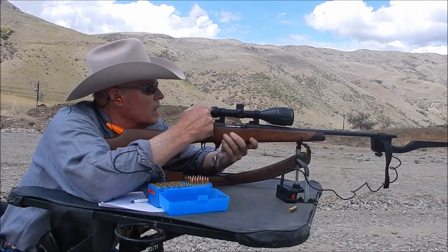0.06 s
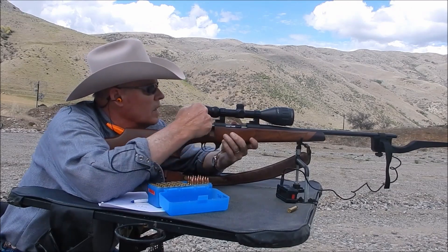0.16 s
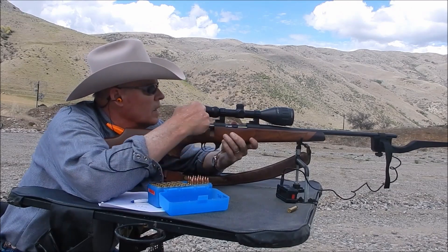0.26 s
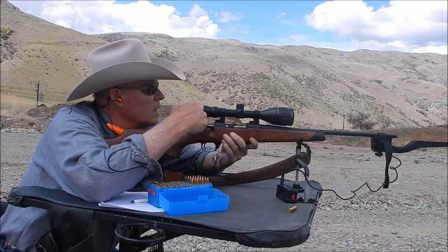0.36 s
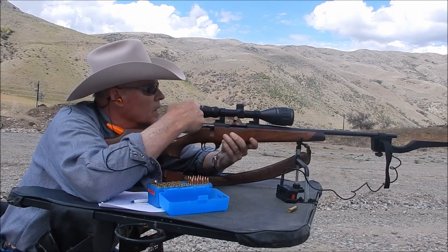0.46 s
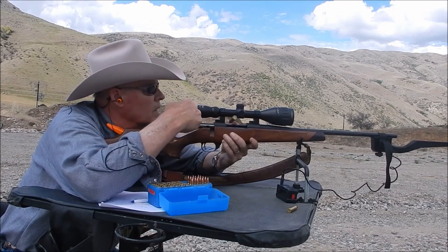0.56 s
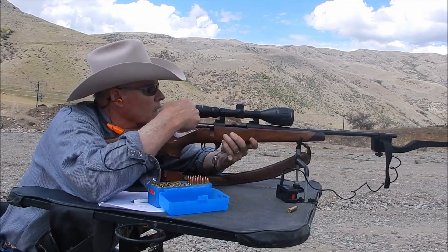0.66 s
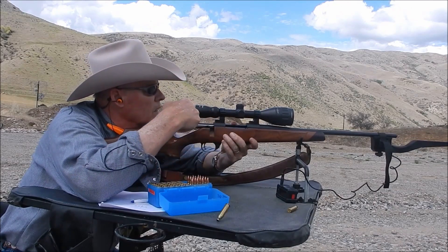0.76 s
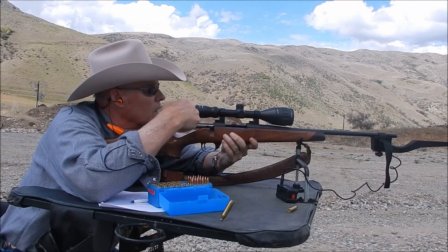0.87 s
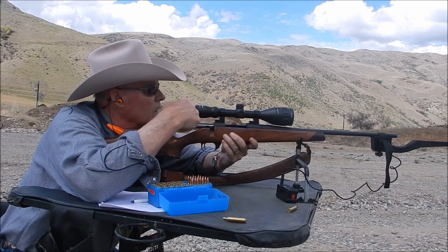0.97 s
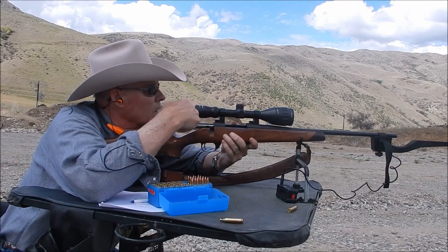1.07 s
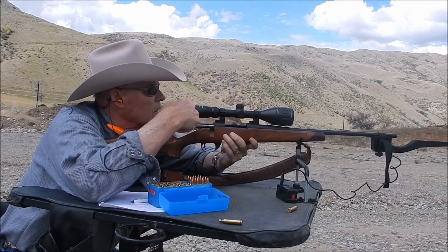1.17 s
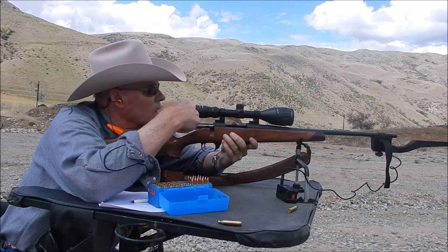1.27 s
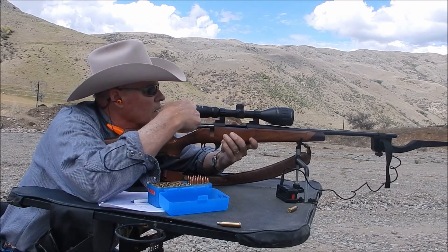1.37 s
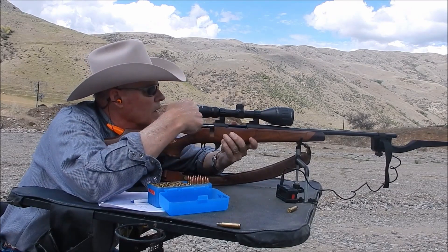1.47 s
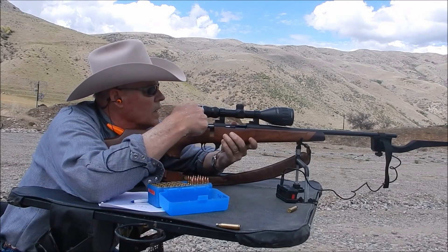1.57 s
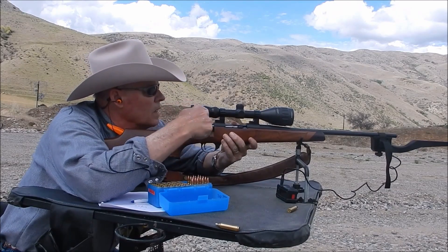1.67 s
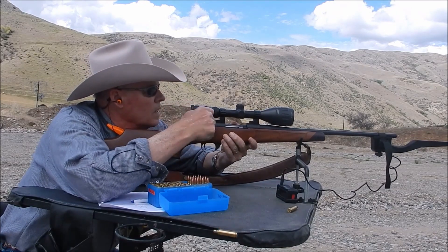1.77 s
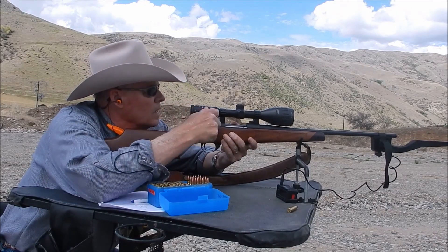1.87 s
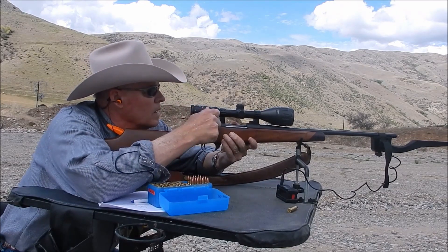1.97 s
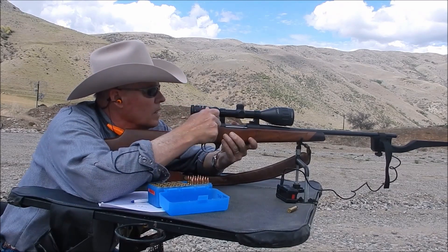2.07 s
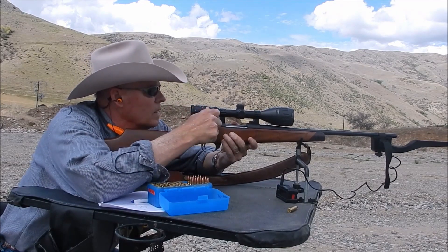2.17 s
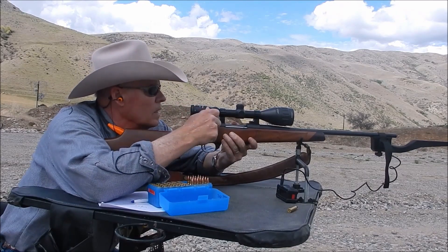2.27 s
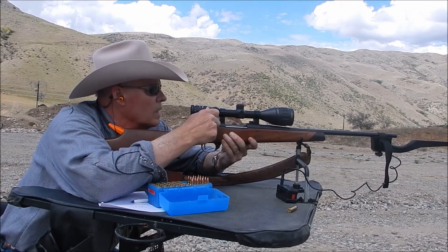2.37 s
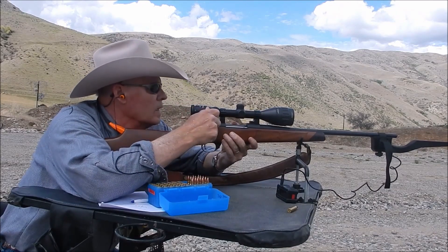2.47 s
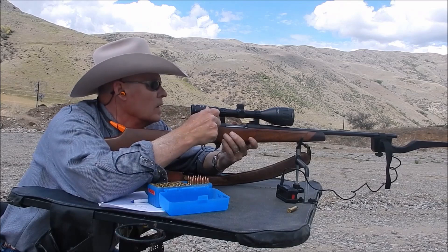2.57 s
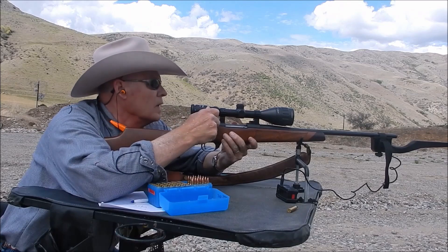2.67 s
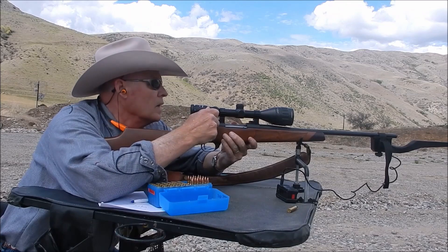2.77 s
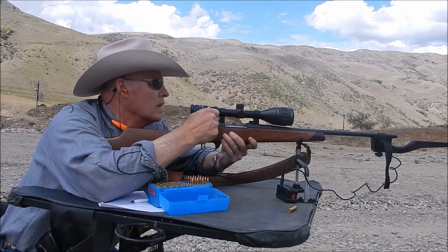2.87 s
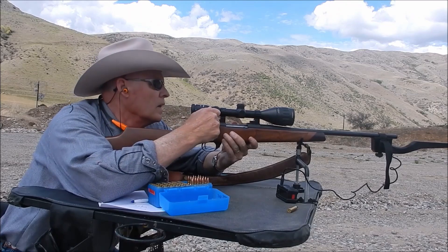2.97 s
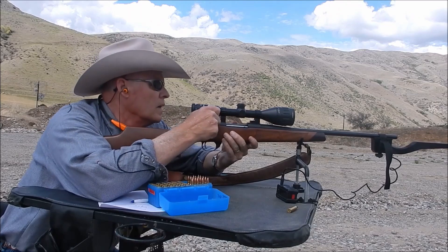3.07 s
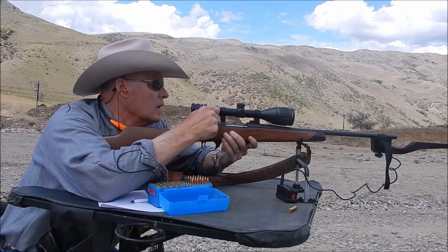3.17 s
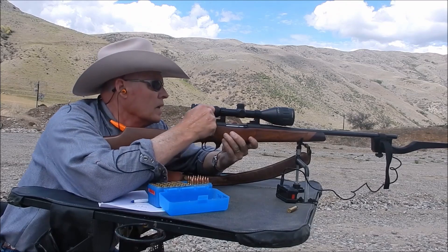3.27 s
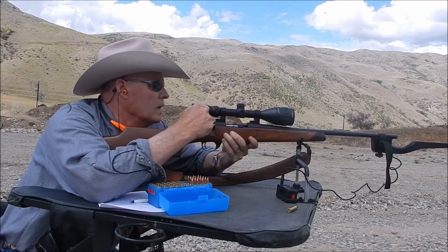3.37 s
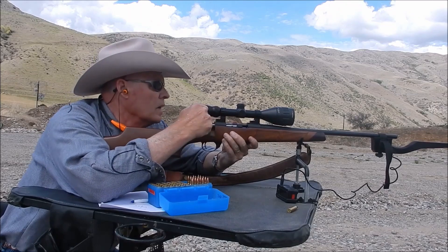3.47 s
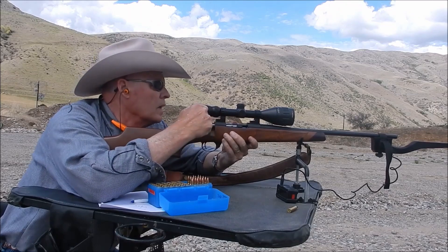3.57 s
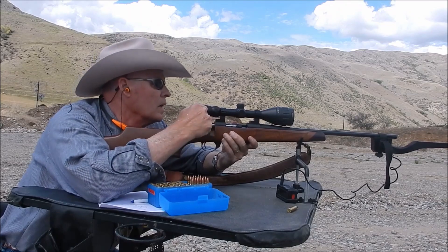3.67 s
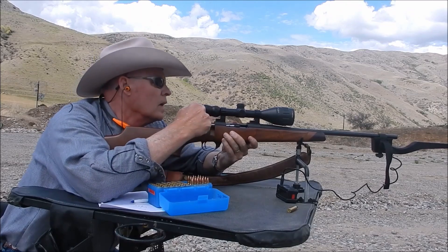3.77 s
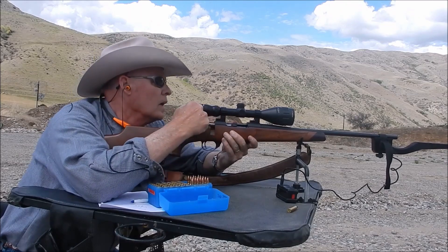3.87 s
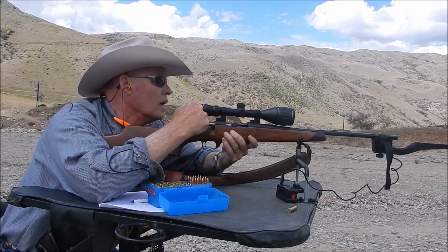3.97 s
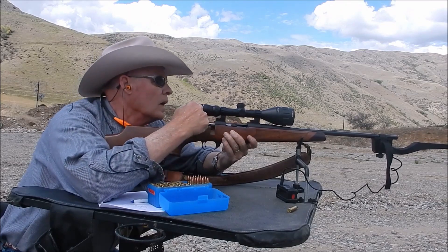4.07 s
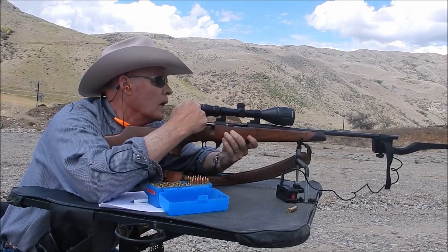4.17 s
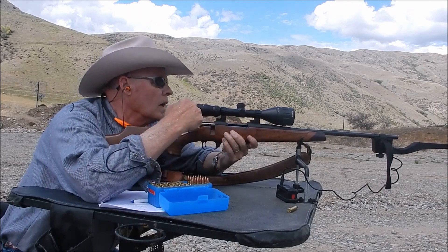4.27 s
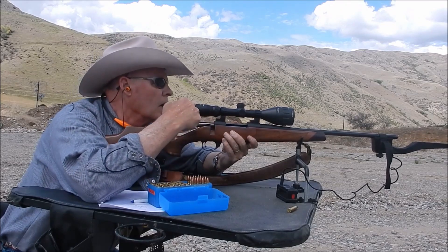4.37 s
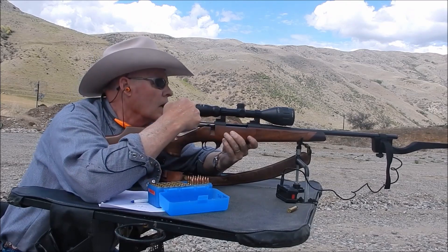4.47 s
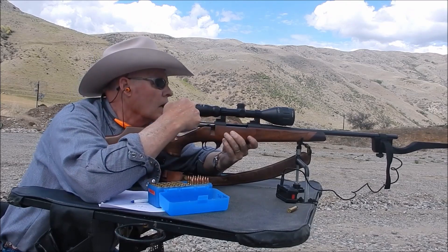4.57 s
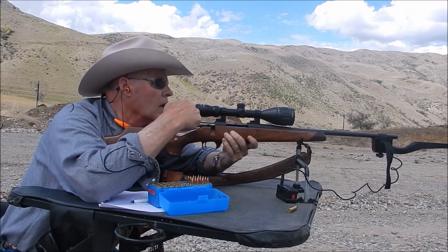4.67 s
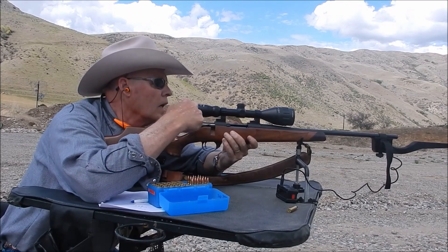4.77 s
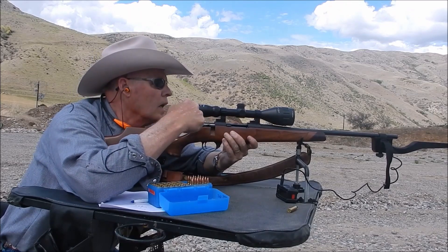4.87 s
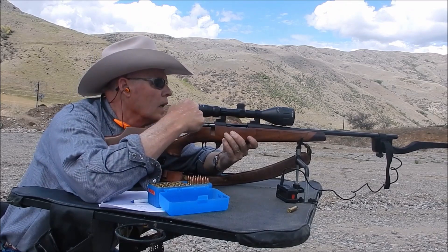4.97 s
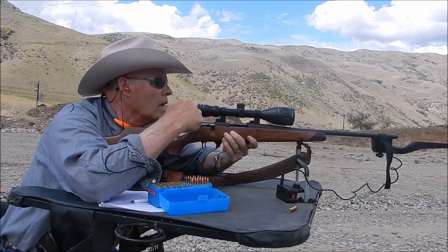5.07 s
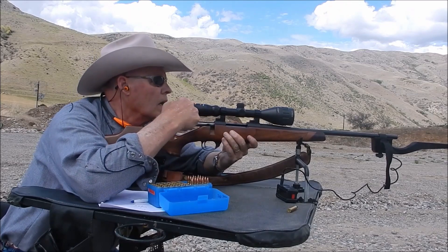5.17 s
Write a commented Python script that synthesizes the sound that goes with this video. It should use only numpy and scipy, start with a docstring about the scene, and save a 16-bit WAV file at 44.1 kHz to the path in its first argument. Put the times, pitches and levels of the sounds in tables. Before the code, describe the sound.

A rifle bolt is worked close by with sharp metallic clacks, a spent case clinks onto a table, and a faint bird whistles outdoors.

```python
'''A rifle bolt worked close to the microphone at an outdoor bench: lifted, drawn, a round fed, closed.
Each blow is a scuff and a burst of rebounds ringing the steel; small slips make the slides.
A thin part and the cartridge ring high; the spent case rings, lands and drums on the table.
Far off a songbird whistles in gliding tones. Shaped noise makes the low rumble, wind on the
microphone and soft hiss; these three dip after two of the blows and come back.'''
import sys
import numpy as np
from scipy import signal
from scipy.fft import rfft, irfft
from scipy.io import wavfile

SR = 44100
rng = np.random.default_rng(int(sys.argv[2]) if len(sys.argv) > 2 else 0)


def materialize(psi):
    """Save the field psi as 16-bit PCM at rate SR to the path in sys.argv[1].

    A 1-D psi becomes a single channel; in a 2-D psi each row is a channel.
    """
    bounded = np.clip(np.atleast_2d(psi).T, -1, 1)
    quanta = np.round(bounded * 32767).astype(np.int16)
    wavfile.write(sys.argv[1], SR, quanta)


N = 229981
TIME = np.arange(N) / SR  # s

# Air around the bench, relative noise spectra: pitch_hz, density_db (per Hz)
RUMBLE_SPECTRUM = [(40, -19.5), (100, -13.5), (125, -1.5), (155, 2.5), (205, -3), (250, -15.5), (300, -4),
                   (345, -5.5), (420, -18.5), (495, -12.5), (600, -26.5), (1200, -36.5), (2500, -75)]
WIND_SPECTRUM = [(25, 3), (85, 11.5), (130, -8.5), (300, -64.5)]
HISS_SPECTRUM = [(400, 4), (1100, 7.5), (2200, -2.5), (3200, -8), (4300, -9), (6000, -19), (8000, -24),
                 (15000, -36.5)]
# Swells of the rumble, and gusts on the microphone: centre_s, half_width_s (to 1/e of the rise), rise_db
RUMBLE_SWELLS = [(1.8, 0.88, 8.4), (2.71, 0.042, 7.4), (3.13, 0.24, 5), (3.8, 0.14, 3.96), (4.42, 1, 8.8)]
GUSTS = [(.2, 0.25, 16), (.93, 0.027, 27)]
RUMBLE_DB, WIND_DB = -45.5, -58.5  # before swells, gusts and dips
LUMPY_DB = 2.1  # rms of random lumps in the rumble
# Dips of rumble, wind and hiss after two of the blows: start_s, depth_db
DIPS = [(.68, 7.5), (2.266, 25.5)]
DIP_FALL_S, DIP_HOLD_S, RECOVERY_DB_PER_S = 0.0081, 0.17, 22

# Strokes of the bolt in its raceway, and a handling rustle at 4.27 s: start_s, length_s, level_db
STROKES = [(0.042, 0.02, -61.5), (0.274, 0.012, -44.5), (0.427, 0.23, -65.5), (1.558, 0.41, -60),
           (1.575, 0.28, -52), (1.654, 0.045, -39), (2.577, 0.036, -70.5), (2.659, 0.063, -80),
           (3.304, 0.16, -68), (4.272, 0.17, -63.5)]
STROKE_RISE_S, STROKE_RELEASE_S = 0.0078, 0.016
SLIPS_PER_S, CLUMP_DB = 3200, 4  # mean catches of the sliding steel, rms unevenness

# What bolt, receiver and barrel ring with: pitch_hz, level_db (relative)
ACTION_MODES = [(1070, -1.5), (1160, -3), (1300, -1), (1450, -0.5), (1700, -0.5), (1950, -3), (2170, 2),
                (2360, 2.5), (2950, 1.5), (3250, -3.5), (3850, 5.5), (4080, 8.5), (4300, 0), (4880, 4),
                (5950, -0.5), (7270, 1), (8750, 0), (10800, -4.5)]
# Metal on metal: start_s, level_db (low and middle bands together, before the gain in rifle),
# treble_db (against that level), strongest_hz, chatter_s (stretched in click)
BLOWS = [(0.2661, -32, -8.5, 4200, 0.0019), (0.2697, -32.5, -9, 3950, 0.002),
         (0.284, -33, -7, 4270, 0.0025), (.503, -37.5, -24, 4360, 0.0029), (0.5404, -32, -24, 2360, 0.0014),
         (0.6364, -26.5, -18.5, 1090, 0.0023), (0.675, -28.5, -28.5, 1300, 0.0012),
         (0.6771, -20.5, -19, 1600, 0.0007), (.688, -28.5, -21, 1310, 0.00041),
         (0.8239, -40, -19.5, 937, 0.0027), (0.8278, -48, -11, 4830, 0.00022),
         (1.0533, -51.5, -17, 2400, 0.00088), (1.5029, -37, -13, 4170, 0.0022),
         (1.6577, -35.5, -23, 2220, 0.004), (1.6794, -25.5, -13.5, 2070, 0.00035),
         (1.7165, -26.5, -16.5, 1070, 0.0027), (1.74, -42.5, -14.5, 2930, 0.0013),
         (1.7706, -29, -22.5, 1020, 0.001), (1.7792, -41.5, -24.5, 3900, .001),
         (1.8, -30.5, -34, 1020, 0.002), (1.8281, -31, -33, 3780, 0.0025),
         (1.9987, -27.5, -27, 3970, 0.0024), (2.263, -34.5, -8, 4820, 0.00013),
         (3.378, -45, -22, 3930, 0.00062), (3.403, -48, -30.5, 3000, .0009),
         (3.414, -47, -22.5, 3000, .001), (3.9282, -36, -31.5, 1170, 0.0018),
         (4.265, -41, -29, 1950, 0.0018), (4.4249, -33, -13, 1040, 0.0019)]
# Low, middle and high band of a blow: from_hz, to_hz
BLOW_BANDS = [(800, 2500), (2500, 5900), (6500, 13500)]
# Dull taps of the hand on the rifle: start_s, level_db (before the tilt in rifle)
HAND_TAPS = [(0.074, -54.5), (0.3284, -52), (0.457, -54), (0.514, -56), (0.75, -55), (1.1465, -56),
             (1.607, -42), (1.624, -44), (1.901, -51), (1.975, -53.5), (3.175, -55), (3.2948, -54),
             (3.761, -55), (4.36, -53), (4.3847, -49.5), (4.836, -52), (5.155, -55)]
RUN_UP = 176  # samples of scuff before a blow
CRACK_S = 0.0009  # time for the crack to fall to 1/e
# A blow that rings higher has less body: low and middle are equal at EVEN_HZ
EVEN_HZ, THINNING_DB_PER_OCTAVE = 1380, 4.5

# A thin part of the action rings in close, beating modes: pitch_hz, level_db (relative), t60_s
THIN_LOW_MODES = [(9722, 0, 0.2), (9679, -7, 0.21), (9790, -11, 0.12)]
THIN_HIGH_MODES = [(14145, -1, .14), (14210, -9, 0.11), (14600, -11, .13)]
THIN_SHIFT = 0.0015  # rms pitch shift from clink to clink, as a share
# Its clinks: start_s, lower_ring_db, upper_ring_db, tick_db (before the tilt in rifle)
CLINKS = [(0.228, -68, -90, -58), (0.505, -63.5, -43, -65), (0.545, -47, -43, -70), (0.828, -72, -77, -65),
          (2.264, -41, -37, -64.5), (2.404, -65, -69, -68.5), (2.46, -60.5, -71.5, -68),
          (2.501, -84, -78, -72.5), (2.528, -79, -77, -69.5), (2.543, -55.5, -73, -65),
          (2.6104, -65.5, -59, -61), (2.677, -69, -65, -69), (2.702, -64.5, -61, -66)]
# Fingers close on the thin part and stop its ring
GRIP_S, GRIP_DB_PER_S = 2.725, 800

# The spent case rings as it is flung out: pitch_hz, level_db, t60_s
EJECTED_MODES = [(1950, -45, 0.22), (4130, -48, .14), (7300, -59, 0.13)]
EJECT_S = 0.679
# Table top under the case: pitch_hz, level_db (relative)
TABLE_MODES = [(175, 4.5), (255, -3.5), (345, -3.5), (420, -1), (506, -3), (610, -12)]
# The case landing on the table: start_s, level_db
BOUNCES = [(.831, -34), (.845, -39), (1.054, -41.5)]

# Whistles of the far bird: start_s, length_s, start_hz, end_hz, level_db
BIRD_NOTES = [(0.784, 0.13, 3020, 2620, -75), (2.9, 0.15, 3460, 3166, -86.5),
              (3.306, 0.11, 4760, 4720, -81), (3.617, 0.12, 3013, 2956, -64.5),
              (3.817, 0.033, 3900, 2130, -60), (3.986, 0.032, 3900, 2220, -57),
              (4.099, 0.047, 2970, 2800, -57.5), (4.135, 0.078, 2010, 1967, -53),
              (4.269, 0.027, 2220, 2100, -53)]
BURR = 0.02  # rms pitch scatter of the burred note, as a share

# Cartridge, lower and upper modes: pitch_hz, level_db (relative)
CARTRIDGE_LOW_MODES = [(5982, 0), (6043, -6), (8800, -22)]
CARTRIDGE_HIGH_MODES = [(12550, 0), (12850, -4), (15050, -6)]
# Its contacts as it is fed: start_s, lower_ring_db, upper_ring_db, t60_s (of the lower modes)
FEED_CONTACTS = [(1.6573, -27.5, -56, 0.021), (1.6795, -36, -51.5, 0.063), (1.74, -34, -53.5, 0.16),
                 (1.7788, -36.5, -54, 0.07), (1.829, -38, -52, 0.026)]
HIGH_RING_SHARE = 0.45  # upper modes' t60 as a share of the lower modes'

PORT_LAG_SAMPLES = 0.33  # the right microphone port hears this much later
EDGE_HZ = 16200  # upper band limit


def amp(db):
    """Decibels to gain."""
    return 10 ** (np.asarray(db) / 20)


def evened(x):
    """Scaled to rms 1."""
    return x / np.sqrt(np.mean(x ** 2) + 1e-20)


def add(mix, s, sound):
    """Mixes a sound in at s seconds."""
    part = mix[max(round(s * SR), 0):][:len(sound)]
    part += sound[:len(part)]


def band(x, edges, order=3):
    """Causal band-pass."""
    edges = np.clip(edges, 10, SR / 2 - 100)
    return signal.sosfilt(signal.butter(order, edges, "band", fs=SR, output="sos"), x)


def noise(spectrum):
    """Noise of rms 1 with the given spectrum."""
    hz, db = np.transpose(spectrum)
    log_hz = np.log(np.fft.rfftfreq(N, 1 / SR) + 1)
    shape = amp(np.interp(log_hz, np.log(hz), db))
    return evened(irfft(rfft(rng.standard_normal(N)) * shape, N))


def wander(rate_hz):
    """Random wavering of rms 1, whose spectrum falls to 1/e at rate_hz."""
    shape = np.exp(-(np.fft.rfftfreq(N, 1 / SR) / rate_hz) ** 2)
    return evened(irfft(rfft(rng.standard_normal(N)) * shape, N))


def damped(modes, t60_at_1k, fall):
    """Gives each mode its decay time: higher modes die sooner."""
    return [(hz, db, t60_at_1k * (hz / 1000) ** -fall) for hz, db in modes]


def ring(modes, spread_db=0, shift=0):
    """Dying modes of a struck body; mode levels and the common pitch may scatter from blow to blow."""
    t = np.arange(16000) / SR
    pitch = 1 + shift * rng.standard_normal()
    out = np.zeros(len(t))
    for hz, db, t60 in modes:
        sign = rng.choice([-1, 1])
        level_db = db + spread_db * rng.standard_normal() - 60 * t / t60
        out += sign * amp(level_db) * np.sin(2 * np.pi * hz * pitch * t)
    return out


def swelling(rows):
    """Decibels added by bell-shaped swells."""
    return sum(db * np.exp(-((TIME - s) / width) ** 2) for s, width, db in rows)


def dipping(recovery_db_per_s):
    """Decibels lost in the dips: a quick fall, a hold, a steady recovery."""
    lost_db = np.zeros(N)
    for s, depth_db in DIPS:
        fall = np.clip((TIME - s) / DIP_FALL_S, 0, 1)
        recovered_db = recovery_db_per_s * (TIME - s - DIP_HOLD_S)
        lost_db += fall * np.clip(depth_db - recovered_db, 0, depth_db)
    return lost_db


def pair(spectrum, side_db, left_db):
    """Stereo noise: a shared part and a weaker part in which the two sides differ."""
    mid, side = noise(spectrum), amp(side_db) * noise(spectrum)
    return np.array([amp(left_db / 2) * (mid + side), amp(-left_db / 2) * (mid - side)])


def air(hiss_db=-61.0, hiss_follow=0.29, hiss_recovery_db_per_s=18):
    """A hollow, lumpy rumble, wind buffeting each microphone port, and a soft hiss that rises with the rumble."""
    swell_db, dip_db = swelling(RUMBLE_SWELLS), dipping(RECOVERY_DB_PER_S)
    rumble_db = RUMBLE_DB + swell_db - dip_db + LUMPY_DB * wander(6.7)
    rumble = amp(rumble_db) * pair(RUMBLE_SPECTRUM, side_db=-19, left_db=-1.5)
    wind_db = WIND_DB + swelling(GUSTS) - dip_db
    wind = amp(wind_db) * pair(WIND_SPECTRUM, side_db=-3.5, left_db=-9.5)
    hiss_level_db = hiss_db + hiss_follow * swell_db - dipping(hiss_recovery_db_per_s)
    hiss = amp(hiss_level_db) * pair(HISS_SPECTRUM, side_db=-7.5, left_db=-0.5)
    return rumble + wind + hiss


def strokes():
    """Pressure of the sliding bolt or handling hand: each stroke rises, holds and dies away."""
    pressure = np.zeros(N)
    for s, length, db in STROKES:
        rise = np.clip((TIME - s) / STROKE_RISE_S, 0, 1)
        release = np.exp(-np.maximum(TIME - s - length, 0) / STROKE_RELEASE_S)
        pressure += amp(db) * rise * release
    return pressure


def slide(grit_db=-1, top_hz=4600):
    """Sliding steel catches in clumps of small slips that ring the action, over a dull grit."""
    caught = rng.random(N) < SLIPS_PER_S / SR
    slips = rng.standard_normal(N) * caught * amp(CLUMP_DB * wander(76))
    steel = ring(damped(ACTION_MODES, 0.064, 0.88))
    rung = evened(band(signal.oaconvolve(slips, steel)[:N], [500, top_hz], order=2))
    grit = evened(band(slips, [750, 3600], order=2))
    return evened(rung + amp(grit_db) * grit) * strokes()


def band_levels(db, treble_db, ring_hz):
    """Shares a blow's level among low, middle and high: the higher it rings, the thinner it is."""
    body_db = -THINNING_DB_PER_OCTAVE * np.log2(ring_hz / EVEN_HZ)
    middle_db = db - 10 * np.log10(1 + amp(body_db) ** 2)
    return middle_db + body_db, middle_db, db + treble_db


def blow_force(chatter, rattle, run_up_db):
    """Force at the contact: a rising scuff, one blow, then a burst of tiny rebounds."""
    t = np.arange(8000) / SR
    struck = rng.random(len(t)) < 5000 / SR  # 5000 rebounds per second on average
    rebounds = rng.standard_normal(len(t)) * struck * np.exp(-(t / (1.96 * chatter)) ** 2)
    force = rattle * rebounds / (np.linalg.norm(rebounds) + 1e-9)
    force[0] += 1
    scuff = rng.standard_normal(RUN_UP) * np.linspace(0, 1, RUN_UP) ** 2
    return np.r_[amp(run_up_db) * scuff / np.linalg.norm(scuff), force]


def click(levels_db, ring_hz, chatter, favour_db=8.0, crack_db=0.0, rattle=0.92, run_up_db=-13, softness=0.71):
    """A scuff, a blow and its rebounds ring the action; the contact point favours some modes."""
    force = blow_force(chatter, rattle, run_up_db)
    modes = []
    for hz, db in ACTION_MODES:
        favoured_db = db + favour_db * np.exp(-(np.log(hz / ring_hz) / 0.065) ** 2)
        # the parts sit differently at each blow, which shifts the modes a little
        modes.append((hz * (1 + 0.019 * rng.standard_normal()), favoured_db))
    t = np.arange(8000) / SR
    body = ring(damped(modes, 0.024, 0.73), spread_db=0.5)[:len(t)]
    crack = rng.standard_normal(len(t)) * np.exp(-t / CRACK_S)  # countless heavily damped modes
    blow = body / np.linalg.norm(body) + amp(crack_db) * crack / np.linalg.norm(crack)
    # the contact is slightly soft
    sound = signal.lfilter([1], [1, -softness], signal.fftconvolve(force, blow))
    parts = [band(sound, edges) for edges in BLOW_BANDS]
    levelled = sum(amp(db) * part / np.linalg.norm(part) for db, part in zip(levels_db, parts))
    return levelled * np.sqrt(SR / 100)  # band levels are rms over 10 ms


def gripped(s):
    """Gain of a ring that is held and stopped at s seconds."""
    return amp(-GRIP_DB_PER_S * np.maximum(TIME - s, 0))


def rifle(click_db=1.0, tap_tilt_db=(0, -3, -28), tick_tilt_db=(-2.5, 1, -15)):
    """Blows of the action, hand taps, and clinks of the thin part; tilts are low, middle, high."""
    out, thin = np.zeros((2, N))
    lead = RUN_UP / SR  # the scuff comes before the blow
    for s, db, treble_db, ring_hz, chatter in BLOWS:
        levels_db = band_levels(db, treble_db, ring_hz)
        add(out, s - lead, amp(click_db) * click(levels_db, ring_hz, chatter + 1e-5))
    for s, db in HAND_TAPS:
        add(out, s - lead, click(db + np.array(tap_tilt_db), ring_hz=1280, chatter=0.0028))
    for s, low_db, high_db, tick_db in CLINKS:
        levels_db = tick_db + np.array(tick_tilt_db)
        add(out, s - lead, click(levels_db, ring_hz=2900, chatter=0.00029, crack_db=11.5))
        add(thin, s, amp(low_db) * ring(THIN_LOW_MODES, shift=THIN_SHIFT))
        add(thin, s, amp(high_db) * ring(THIN_HIGH_MODES, shift=THIN_SHIFT))
    return out + thin * gripped(GRIP_S)


def spent_case(clatter_db=-1):
    """The case flies out ringing, lands and bounces; the table top drums with a few modes and a dull clatter."""
    out = np.zeros(N)
    add(out, EJECT_S, ring(EJECTED_MODES))
    for s, db in BOUNCES:
        thud = ring(damped(TABLE_MODES, 0.13, 0.25), spread_db=1.0)
        t = np.arange(len(thud)) / SR
        rough = evened(band(rng.standard_normal(len(t)), [300, 1000], order=2))
        clatter = rough * np.exp(-t / 0.012)
        onset = 1 - np.exp(-t / 0.0007)
        add(out, s, amp(db) * (thud + amp(clatter_db) * clatter) * onset)
    return out


def bird(flutter_db=2.0):
    """Whistles that swell, slide down and fade, fluttering in level; the lowest-starting note is burred."""
    out, flutter = np.zeros(N), amp(flutter_db * wander(120))
    lowest_hz = min(note[2] for note in BIRD_NOTES)
    for s, length, start_hz, end_hz, db in BIRD_NOTES:
        u = np.linspace(0, 1, int(length * SR))
        hz = end_hz + (start_hz - end_hz) * (1 - u) ** 1.3
        if start_hz == lowest_hz:
            hz = hz * (1 + BURR * wander(250)[:len(u)])
        swell = signal.windows.tukey(len(u), 0.5) * (end_hz / hz) ** 2  # louder as the pitch comes down
        whistle = np.sin(2 * np.pi * np.cumsum(hz) / SR)
        add(out, s, amp(db) * evened(whistle * swell))
    return out * flutter


def cartridge():
    """Each contact on the way into the chamber rings the brass: long while it is loose, briefly where it is held."""
    out = np.zeros(N)
    for s, low_db, high_db, t60 in FEED_CONTACTS:
        lower = [(hz, low_db + db, t60) for hz, db in CARTRIDGE_LOW_MODES]
        upper = [(hz, high_db + db, t60 * HIGH_RING_SHARE) for hz, db in CARTRIDGE_HIGH_MODES]
        add(out, s, ring(lower + upper))
    return out


def outdoors(x, wet_db, t60, left_db=-1.16):
    """Direct sound plus a short scatter from bench and gravel, different on each side."""
    t = np.arange(SR // 2) / SR
    scatter = band(rng.standard_normal((2, len(t))), [300, 7000], order=1)
    scatter = scatter * amp(-60 * t / t60) * (t > 0.003)  # the first return comes after 3 ms
    wet = signal.fftconvolve(x[None], scatter / np.linalg.norm(scatter[0]), axes=1)[:, :N]
    return (x + amp(wet_db) * wet) * amp([[left_db / 2], [-left_db / 2]])


def scene():
    """The rifle close by, the bird far off, the air all round."""
    near = outdoors(slide() + rifle() + spent_case() + cartridge(), wet_db=-18.0, t60=0.055)
    far = outdoors(bird(), wet_db=-15, t60=0.3)
    return near + far + air()


def record(dry, lean=0.083):
    """The microphone has a narrow notch; the right port hears a little later and duller; then the band limit."""
    coloured = signal.lfilter(*signal.iirnotch(2520, 22, fs=SR), dry)
    high_pass = signal.firwin(15, 5500, pass_zero=False, fs=SR)
    treble = signal.oaconvolve(coloured, high_pass[None], "same")
    left, right = coloured + lean * treble * np.array([[1], [-1]])
    lag = np.exp(-2j * np.pi * np.fft.rfftfreq(N) * PORT_LAG_SAMPLES)
    right = irfft(rfft(right) * lag, N)
    low_pass = signal.firwin(511, EDGE_HZ, window=("kaiser", 9), fs=SR)
    return signal.oaconvolve(np.array([left, right]), low_pass[None], "same")


dry = scene()
out = record(dry)
materialize(out)
```